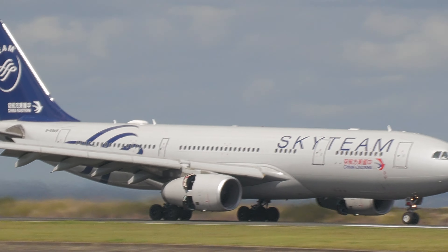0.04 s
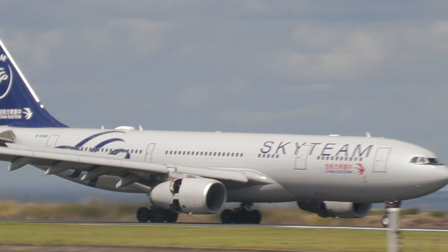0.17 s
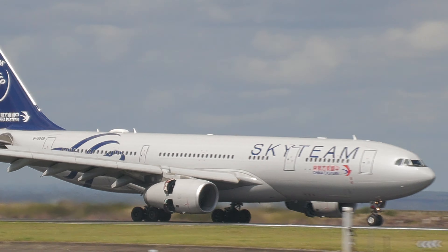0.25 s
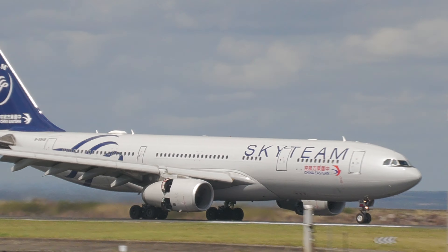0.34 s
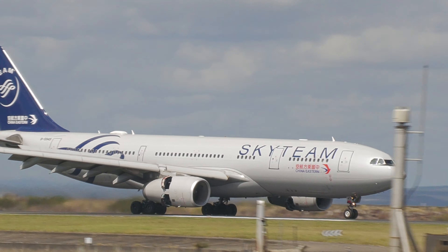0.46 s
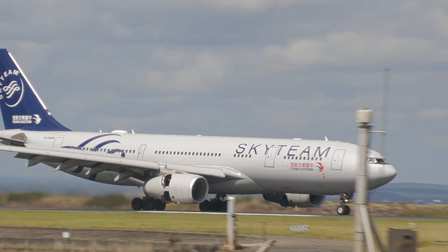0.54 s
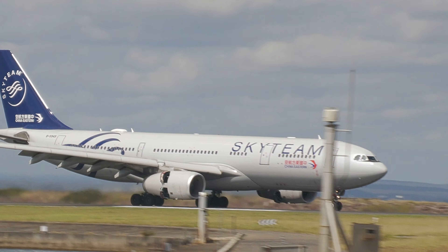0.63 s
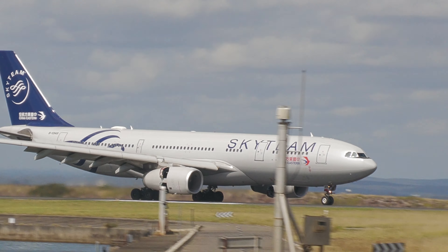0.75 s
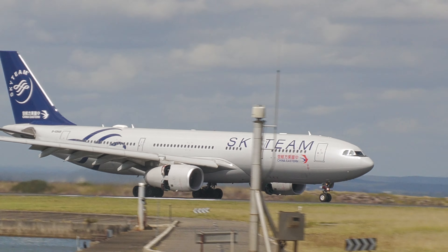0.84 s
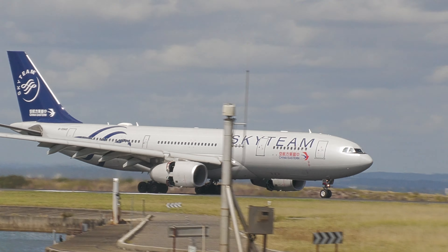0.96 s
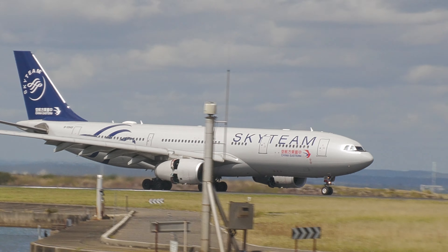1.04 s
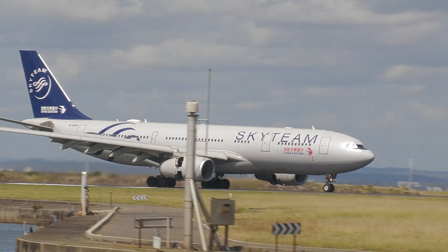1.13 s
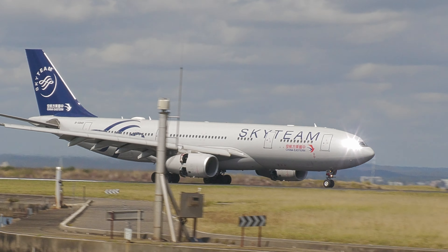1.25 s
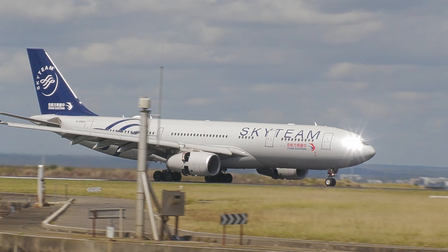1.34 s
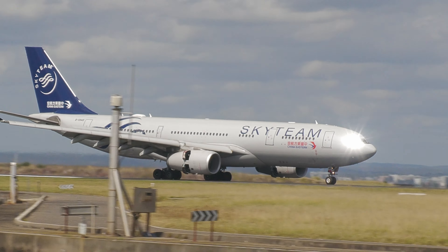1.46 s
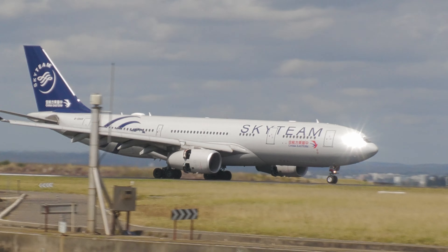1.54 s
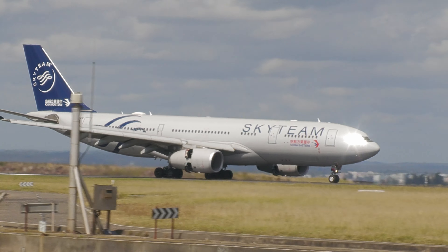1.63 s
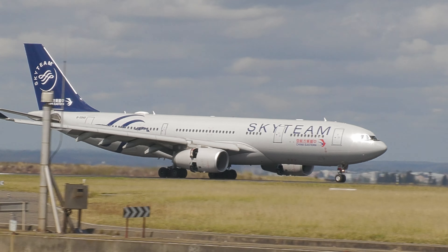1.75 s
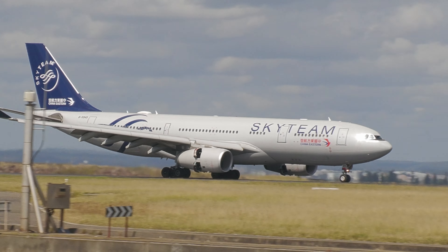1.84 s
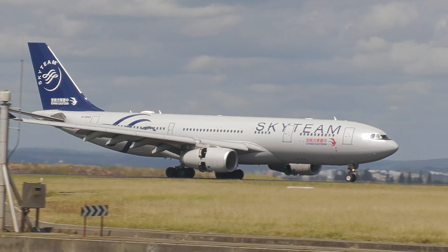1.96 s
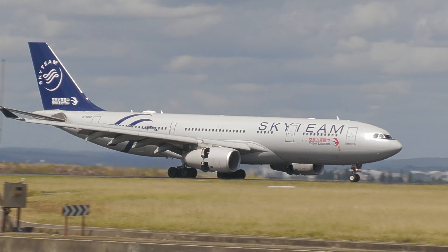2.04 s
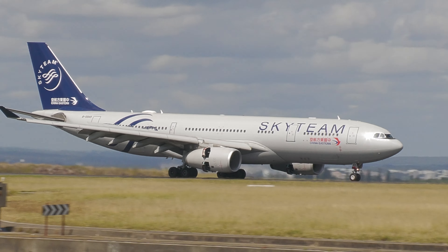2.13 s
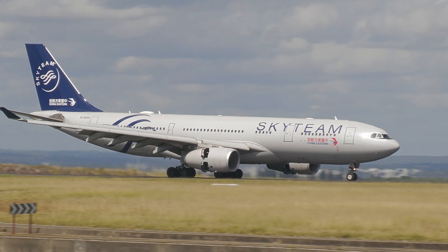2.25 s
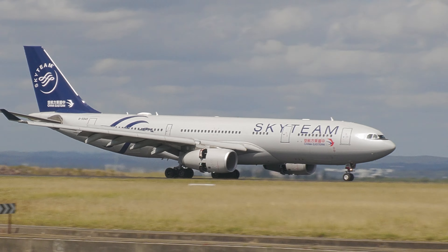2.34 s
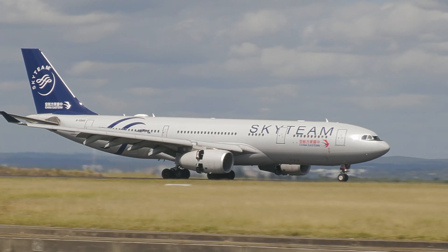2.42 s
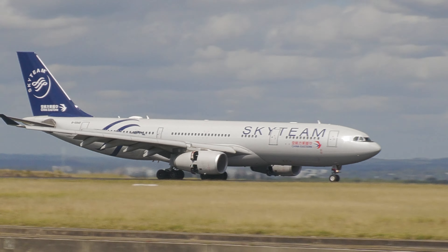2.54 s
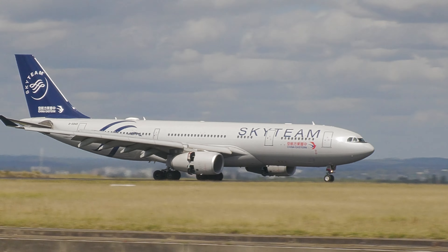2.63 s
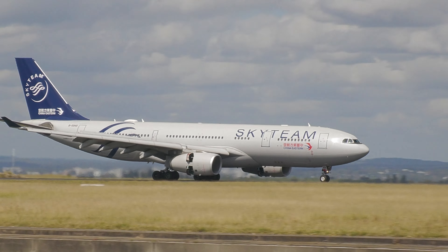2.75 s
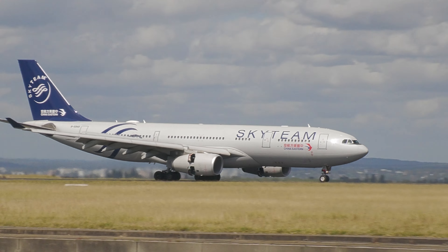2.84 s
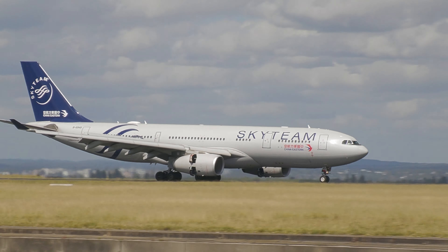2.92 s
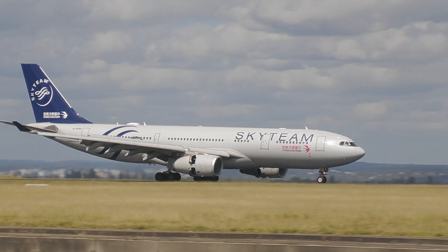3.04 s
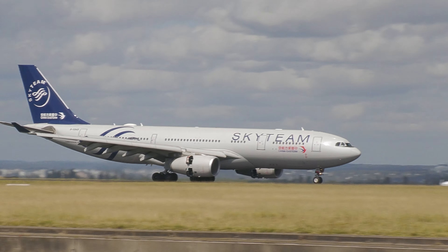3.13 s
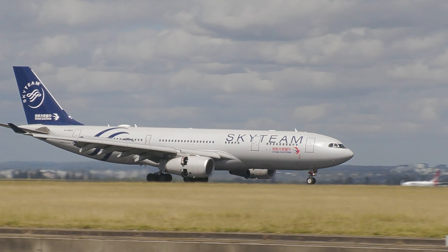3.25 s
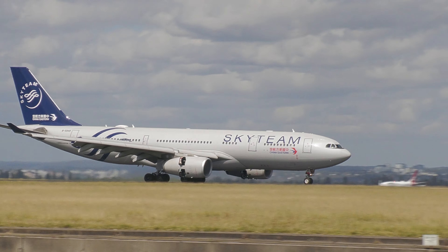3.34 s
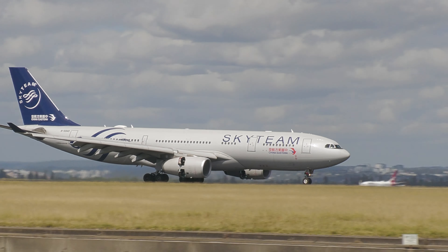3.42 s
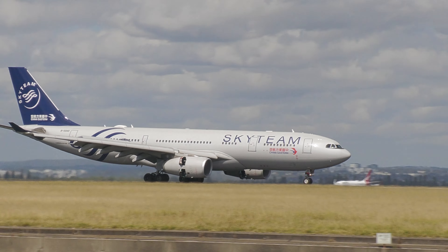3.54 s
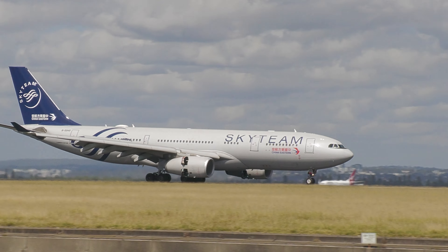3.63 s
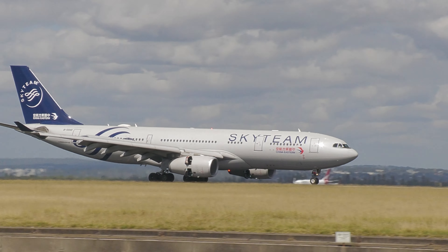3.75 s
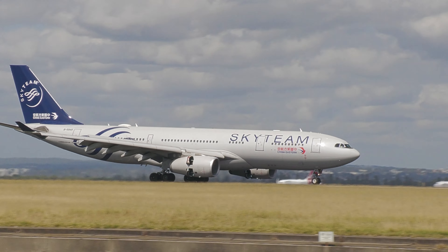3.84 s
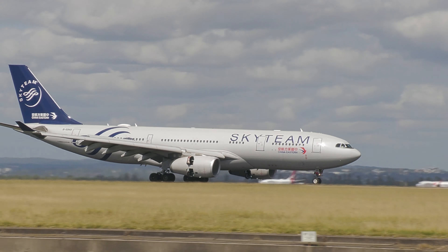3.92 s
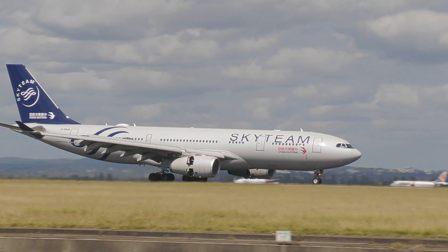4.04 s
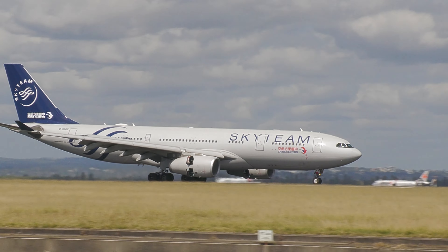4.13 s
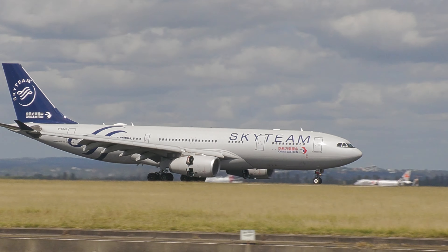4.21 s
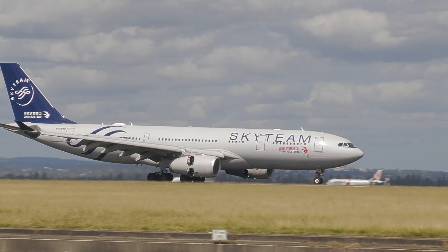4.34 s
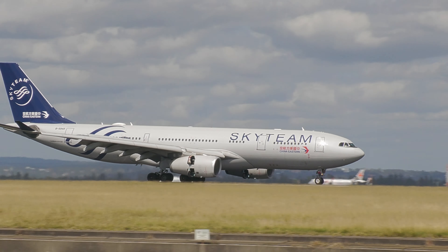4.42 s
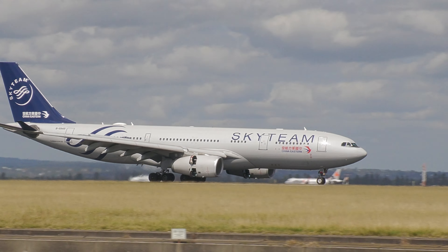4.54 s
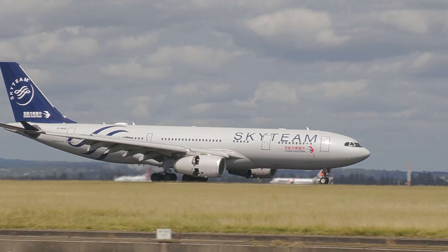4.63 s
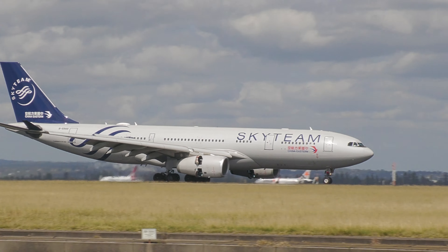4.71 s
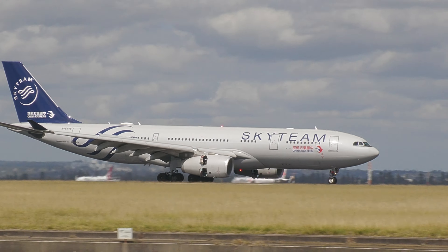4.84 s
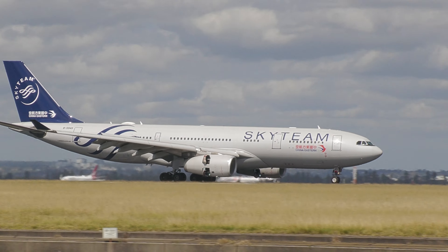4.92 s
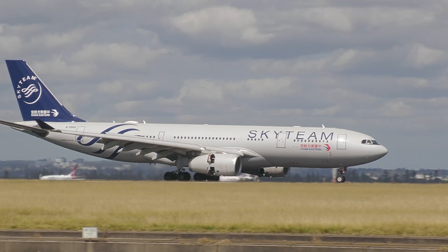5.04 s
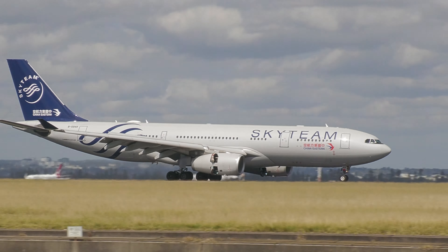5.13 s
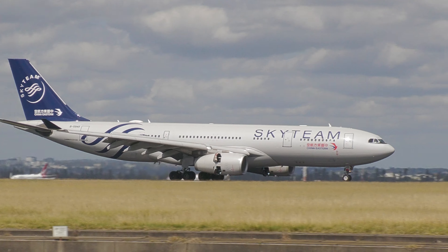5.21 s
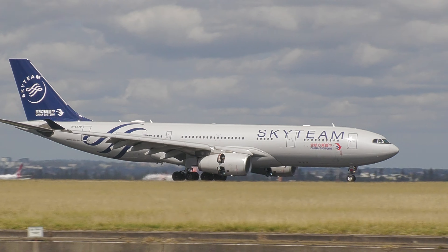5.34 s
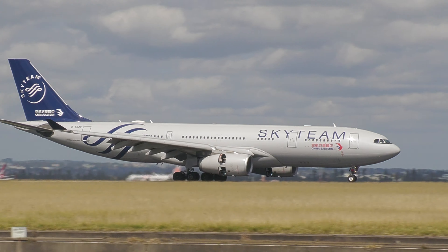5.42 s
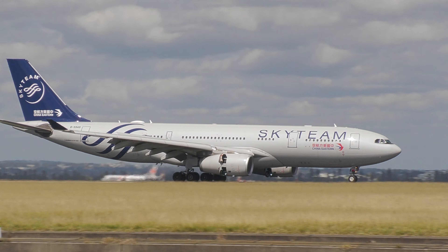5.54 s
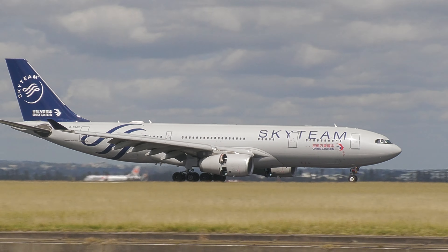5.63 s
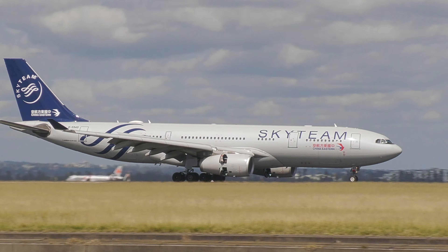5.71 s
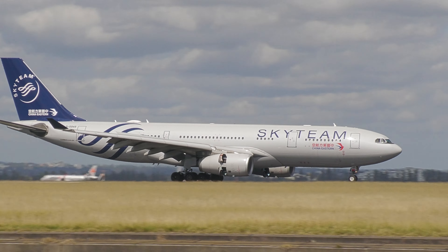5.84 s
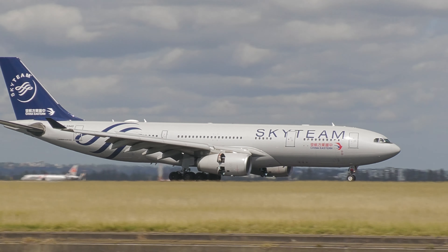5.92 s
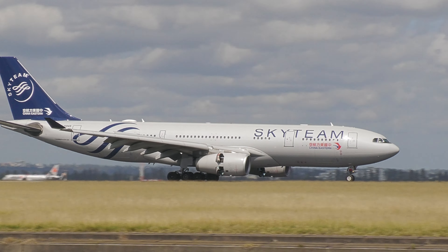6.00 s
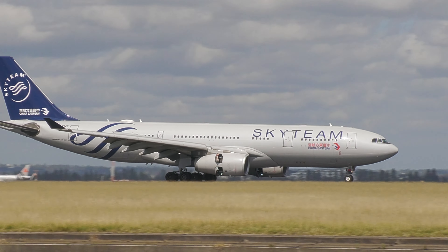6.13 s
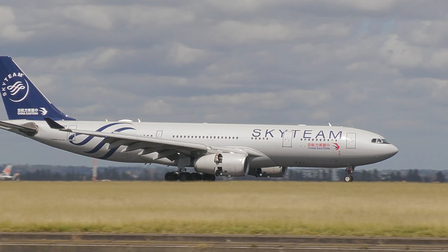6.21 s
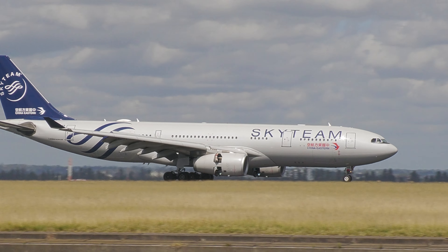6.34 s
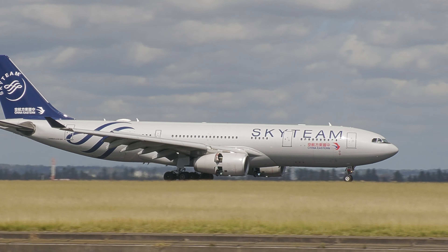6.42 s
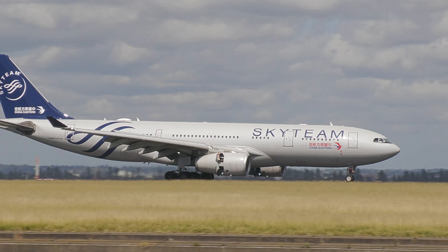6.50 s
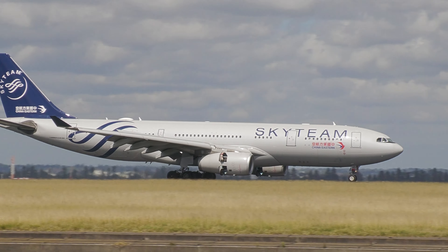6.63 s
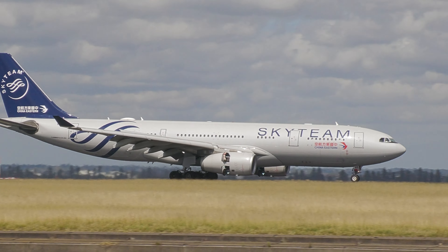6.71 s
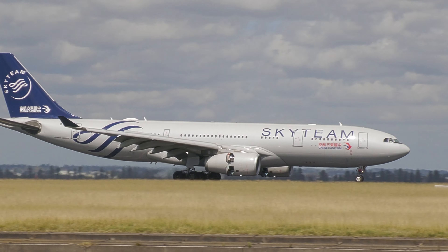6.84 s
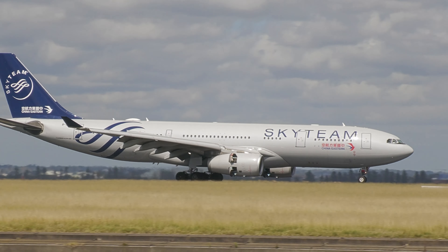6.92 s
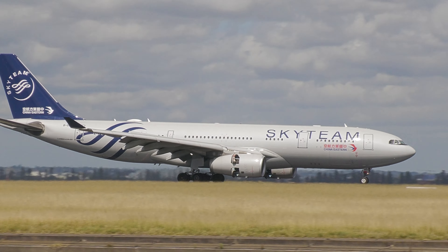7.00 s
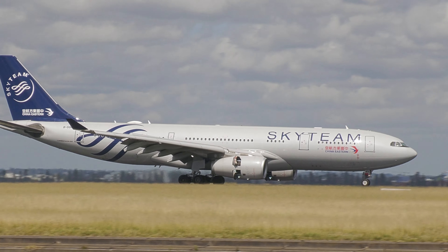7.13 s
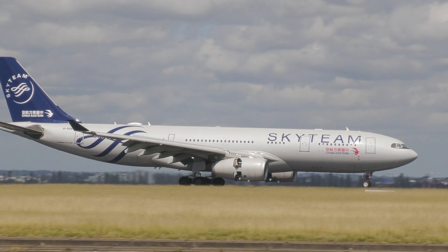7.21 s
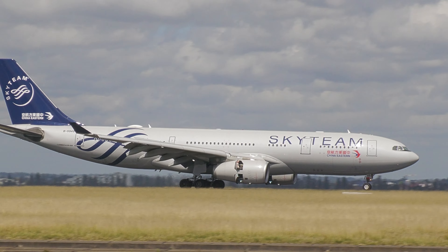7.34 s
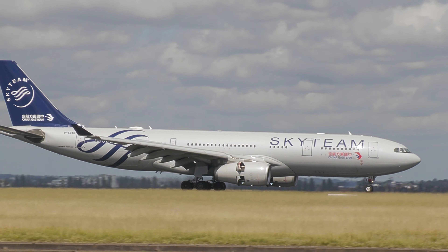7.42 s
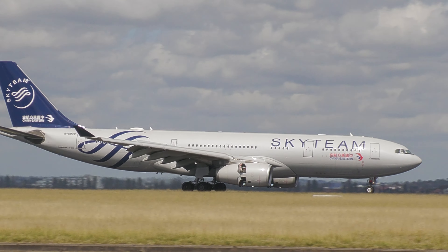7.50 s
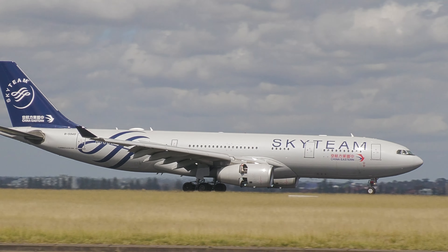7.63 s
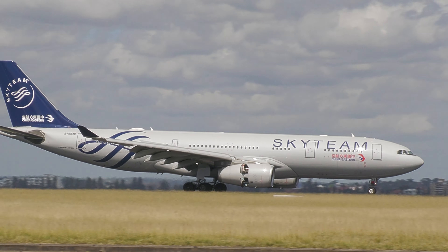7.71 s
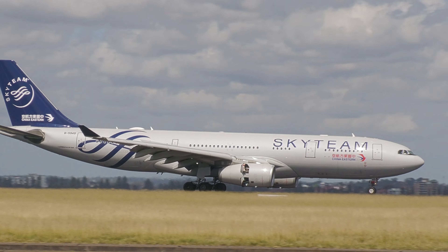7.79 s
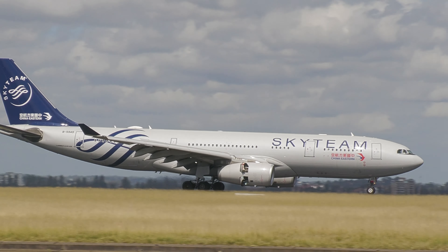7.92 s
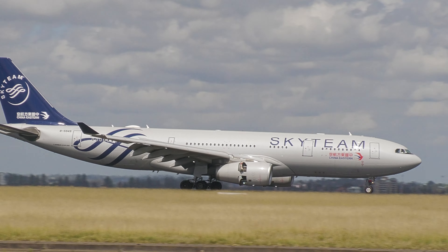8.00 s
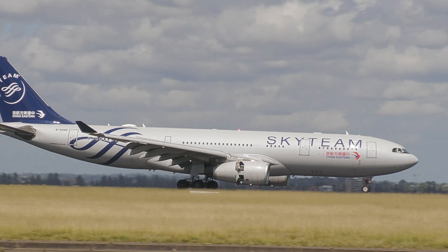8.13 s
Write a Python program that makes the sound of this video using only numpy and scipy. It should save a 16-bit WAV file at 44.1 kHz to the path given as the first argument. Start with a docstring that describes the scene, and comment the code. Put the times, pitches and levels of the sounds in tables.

```python
"""The roar of reversed jets overloads the microphone as a wide-body airliner rolls past on the runway.
The engines then throttle back and it recedes, leaving a low rumble, the whine of the slowing fans,
the din of the airfield and a light breeze. Jets, din and breeze are noise filtered by spectra that
may vary in time; fan tones are sinusoids smeared by random modulation; overload is peak clipping."""
import sys
import numpy as np
from scipy import signal
from scipy.fft import rfft, irfft, next_fast_len
from scipy.io import wavfile

SR = 44100
rng = np.random.default_rng(int(sys.argv[2]) if len(sys.argv) > 2 else 0)


def wrap_up_sound(samples):
    """Save the sound to the file named by the first command line argument, as 16-bit audio."""
    columns = np.atleast_2d(samples).T
    # keep every value between -1 and 1, then stretch to whole-number steps
    tamed = np.clip(columns, -1, 1)
    steps = np.round(tamed * 32767).astype(np.int16)
    wavfile.write(sys.argv[1], SR, steps)


N = 359847
FRAME, HOP = 4096, 1024  # samples
BIN_HZ = np.fft.rfftfreq(FRAME, 1 / SR)
FRAME_S = np.arange(N // HOP + 5) * HOP / SR
TIME = np.arange(N) / SR

# Strength of the jets, driving roar and rumble. Each row: time in seconds, relative level in dB.
THRUST = [(0, -13.0), (0.1, -14.0), (0.3, -12.5), (0.55, -13.5), (1.05, -12.5), (1.2, -12.0), (1.54, -12.0),
          (1.7, -16.0), (2.15, -18.5), (2.88, -23.0), (3.2, -28.5), (4.5, -32.5), (4.75, -36), (5.5, -38.5),
          (6.0, -40.5), (6.85, -41.5), (7.3, -43.5), (8.16, -42.0)]
# Strength at which the engines are half run down, and the scale of the transition.
HALF_RUN_DB, RUN_SPAN_DB = -29.5, 6
# The same for the throaty body of the roar, which collapses earlier.
BODY_HALF_DB, BODY_SPAN_DB = -19, 0.9
# Jet spectra at full reverse and run down. Each row: frequency in Hz, relative density in dB per Hz.
ROAR_FULL = [(20, -61), (150, 6.5), (235, 5.5), (330, 0.5), (560, -2.5), (730, -4.5), (980, -2), (1170, -5),
             (1400, -4), (1620, -8), (3000, -11), (4000, -16.5), (5200, -26), (10500, -72)]
ROAR_IDLE = [(20, -54), (150, -13.5), (330, -3.5), (560, 1), (730, -2.5), (980, -3), (1200, -6),
             (1600, -5.5), (2600, -8.5), (3700, -9.5), (4700, -14), (6300, -22.5), (7600, -36),
             (16000, -54)]
# Brief random swells of the jet noise, each within a narrow band of frequencies.
# Each row: centre in seconds, half length (to 1/e) in seconds, centre in Hz, peak gain in dB.
SWELLS = [(0.36, .18, 560, 4), (1.35, .22, 85, 3), (1.35, 0.2, 1240, 2), (4.196, 0.14, 250, 6)]
SWELL_OCTAVES = 0.33  # half width (to 1/e) of the band
# Part of a far source that differs between the microphones.
# Each row: frequency in Hz, level in dB relative to the common part.
SPREAD = [(30, -22), (100, -18.5), (400, -21), (1500, -32), (4000, -47), (8000, -11)]
# Rumble spectrum before its pitch factor. Each row: nominal frequency in Hz, relative density in dB per Hz.
RUMBLE_SHAPE = [(15, -27), (35, -18.5), (52, -8.5), (70, -1.5), (100, 2.5), (128, 2), (168, -7), (215, -9),
                (310, -19), (600, -60.5), (3000, -120)]
# The rumble trails the thrust, has a ceiling, and loses only a share of each dB that the thrust loses.
RUMBLE_LAG_S, RUMBLE_FULL_DB, RUMBLE_SHARE = 0.04, -17, 0.81
# Factor on the rumble's frequencies before run-down, and the share of it lost when fully run down.
RUMBLE_PITCH, RUMBLE_SAG = 1.028, 0.17
# Voices of the slowing engines: duct howl, fan whine and broad turbine hiss.
# Each row: turning time in seconds, pitch then in Hz, sag in Hz per s, smear in Hz,
# level at the turn in dB, swell before it in dB per s, fade after it in dB per s (negative: a rise).
FAN_TONES = [(3.3, 1985, 50, 170, -43, 0, 3.5), (6.6, 1645, 20, 36, -55.5, 16, -1),
             (7.9, 4096, 60, 1400, -51.5, 7, 1)]
# Spectrum of the airfield's din. Each row: frequency in Hz, relative density in dB per Hz.
DIN = [(15, -25), (35, -2), (55, -1), (92, -10.5), (130, -4.5), (200, -15), (320, -15.5), (550, -16.5),
       (1000, -20.5), (1500, -24.5), (2500, -33), (4000, -47), (7000, -54), (16000, -76)]
# Side to which the din leans. Each row: frequency in Hz, left over right in dB.
DIN_SIDE = [(60, 7.5), (170, 5), (400, 0.5), (900, -6), (2500, -1.5)]
# Spectrum of the breeze's buffeting. Each row: frequency in Hz, relative density in dB per Hz.
BREEZE_SHAPE = [(8, -12), (22, -3.5), (38, -5), (60, -9), (130, -12), (400, -55), (3000, -120)]
# Puffs of breeze. Each row: centre in seconds, half length (to 1/e) in seconds, left in dB, right in dB.
GUSTS = [(5.6, .35, -40, -42), (6.6, 0.35, -42, -37), (7.5, 0.46, -34, -48)]
CALM_DB = -48  # breeze between the puffs
EDGE_HZ = 15800  # upper band limit


def roar(full_db=0.55, idle_db=-1.95, patchy_db=0.83, flutter_db=0.62):
    """Jet mixing noise: turbulence makes broadband sound, thinner as the engines run down, that flutters."""
    idle = rundown()
    spent = sunk(BODY_HALF_DB, BODY_SPAN_DB)
    # Mid-sized eddies make the body, fine ones the hiss; rows are (Hz, weight on the dB that follow).
    body_weight = colour([(150, 0.0), (330, 0.76), (600, 0.96), (900, 0.37)])
    body = body_weight * (1.56 - 5.0 * spent + 2.0 * idle)
    hiss_weight = colour([(1500, 0.015), (3800, 0.77)])
    hiss = hiss_weight * (-0.47 + 0.74 * spent - 1.3 * idle)
    shape = (1 - idle) * colour(ROAR_FULL) + idle * colour(ROAR_IDLE) + body
    level = thrust() + (1 - idle) * full_db + idle * idle_db
    turbulent_air = patchy_db * patches(seconds=0.17, width_hz=310)
    size = unit_band(shape, 280, 2500) * gain_of(level + hiss + swells() + turbulent_air)
    return at_microphones(size) * gain_of(flutter_db * wander(rate_hz=12))


def rumble(rumble_db=-16.5):
    """Large-eddy noise: the deep part of the exhaust outlasts the roar and sinks in pitch."""
    below_ceiling = np.minimum(thrust(RUMBLE_LAG_S) - RUMBLE_FULL_DB, 0)
    level = rumble_db + RUMBLE_SHARE * below_ceiling
    pitch_factor = RUMBLE_PITCH * (1 - RUMBLE_SAG * rundown())
    size = unit_band(colour(RUMBLE_SHAPE, pitch_factor), 50, 220)
    return at_microphones(size * gain_of(level + swells()))


def engine_voice(turn_s, pitch_hz, sag_hz_per_s, smear_hz, level_db, swell_db_per_s, fade_db_per_s):
    """Turbulent modulation smears a sinking tone into a band; the wider the smear, the more it hisses."""
    t = TIME - turn_s
    hz = pitch_hz - sag_hz_per_s * t
    level = level_db + np.minimum(swell_db_per_s * t, -fade_db_per_s * t)
    smear = wander(smear_hz) + 1j * wander(smear_hz)
    carrier = np.exp(2j * np.pi * np.cumsum(hz) / SR)
    return gain_of(level) * (smear * carrier).real


def airfield(din_db=-37.0):
    """Diffuse field: engine noise from all round reaches the two microphones uncorrelated."""
    drift_db = patches(seconds=0.2, width_hz=300)
    size = gain_of(din_db + drift_db) * unit_band(colour(DIN), 0, SR / 2)
    lean = gain_of(colour(DIN_SIDE) / 2)  # half the difference on each side
    return np.array([noise(size * lean), noise(size / lean)])


def breeze(lumpy_db=4.5):
    """Wind buffeting: local pressure fluctuations, unrelated at the two microphones, rise in puffs."""
    size = unit_band(colour(BREEZE_SHAPE), 0, SR / 2)
    puffs = 0
    for s, half_s, left_db, right_db in GUSTS:
        puffs = puffs + gain_of([[left_db], [right_db]]) * np.exp(-((TIME - s) / half_s) ** 2)
    envelopes = np.hypot(puffs, gain_of(CALM_DB))
    return np.array([noise(size) * side * gain_of(lumpy_db * wander(rate_hz=5)) for side in envelopes])


def thrust(lag_s=0):
    """Source strength: the level of the jets in dB on every frame, as it was lag_s earlier."""
    s, db = np.transpose(THRUST)
    return np.interp(FRAME_S - lag_s, s, db)[:, None]


def rundown():
    """Engine state: near 0 at full reverse, approaching 1 at idle."""
    return sunk(HALF_RUN_DB, RUN_SPAN_DB)


def sunk(half_db, span_db):
    """Logistic transition: from 0 towards 1 as the strength of the jets sinks past half_db."""
    return 1 / (1 + np.exp((thrust() - half_db) / span_db))


def swells():
    """Local swells: dB added over frames and bins, Gaussian in time and in log frequency."""
    octaves = np.log2(BIN_HZ + 1)
    total_db = 0
    for s, half_s, hz, db in SWELLS:
        in_time = ((FRAME_S[:, None] - s) / half_s) ** 2
        in_pitch = ((octaves - np.log2(hz)) / SWELL_OCTAVES) ** 2
        total_db = total_db + db * np.exp(-in_time - in_pitch)
    return total_db


def at_microphones(size):
    """Coherence of a far source: almost the same noise reaches both microphones."""
    common = noise(size)
    differing = noise(size * gain_of(colour(SPREAD)))
    return np.array([common + differing, common - differing])


def noise(size):
    """Spectral shaping: white noise filtered by magnitudes over bins, or over frames and bins."""
    white = rng.standard_normal((len(FRAME_S) - 1) * HOP)
    z = signal.stft(white, nperseg=FRAME, noverlap=FRAME - HOP)[2]
    return signal.istft((z.T * size).T, nperseg=FRAME, noverlap=FRAME - HOP)[1][:N]


def colour(points, factor=1):
    """Spectral interpolation: a table on the bins along a log axis; factor slides it up or down."""
    hz, value = np.transpose(points)
    return np.interp(np.log(BIN_HZ / factor + 1), np.log(hz), value)


def unit_band(db, lo_hz, hi_hz):
    """Band normalisation: magnitudes that give noise an rms of one inside a band."""
    size = gain_of(db)
    inside = (BIN_HZ > lo_hz) & (BIN_HZ < hi_hz)
    return size / np.sqrt(np.mean(size ** 2 * inside, axis=-1, keepdims=True))


def patches(seconds, width_hz):
    """Correlated fluctuation: a random field smoothed over frames and bins, with an rms of one."""
    field = rng.standard_normal((len(FRAME_S), len(BIN_HZ)))
    rate = np.fft.fftfreq(len(FRAME_S), HOP / SR)[:, None] * seconds
    ripple = np.fft.rfftfreq(len(BIN_HZ), SR / FRAME) * width_hz
    smoothing = np.exp(-2 * (rate ** 2 + ripple ** 2))
    return evened(np.fft.irfft2(np.fft.rfft2(field) * smoothing, field.shape))


def wander(rate_hz):
    """Slow modulation: Gaussian-lowpassed noise (1/e at rate_hz) with an rms of one."""
    size = next_fast_len(N)
    hz = np.fft.rfftfreq(size, 1 / SR)
    spectrum = rfft(rng.standard_normal(size)) * np.exp(-(hz / rate_hz) ** 2)
    return evened(irfft(spectrum, size)[:N])


def evened(x):
    """Normalisation: scales to an rms of one."""
    return x / np.sqrt(np.mean(x ** 2) + 1e-20)


def gain_of(db):
    """Logarithmic level: decibels to amplitude."""
    return 10 ** (np.asarray(db) / 20)


def scene(left_db=0.7, right_db=-1.92):
    """Superposition: the airliner, a little to the left, over the din of the airfield and the breeze."""
    airliner = roar() + rumble() + sum(engine_voice(*row) for row in FAN_TONES)
    return airliner * gain_of([[left_db], [right_db]]) + airfield() + breeze()


def record(dry, drive_db=0.04, hiss_db=-69):
    """Overload: a faintly hissing input stage clips the loudest peaks, which crackle; a lowpass follows."""
    ceiling = 0.69  # amplitude
    x = dry * gain_of(drive_db) + gain_of(hiss_db) * rng.standard_normal(dry.shape)
    clipped = np.clip(x, -ceiling, ceiling)
    lowpass = signal.firwin(511, EDGE_HZ, window=("kaiser", 9), fs=SR)
    return signal.oaconvolve(clipped, lowpass[None], "same")


dry = scene()
out = record(dry)
wrap_up_sound(out)
```